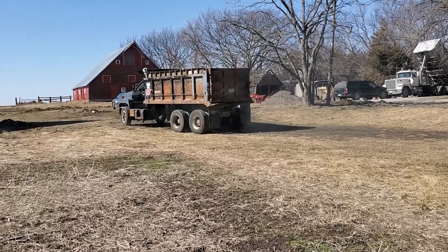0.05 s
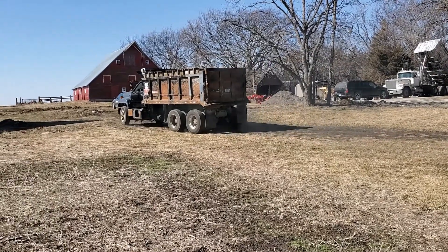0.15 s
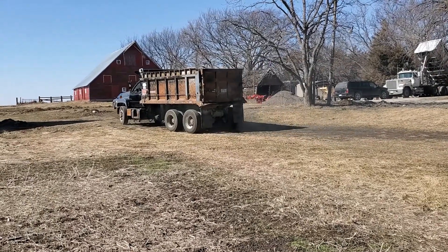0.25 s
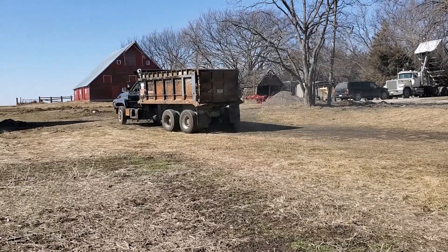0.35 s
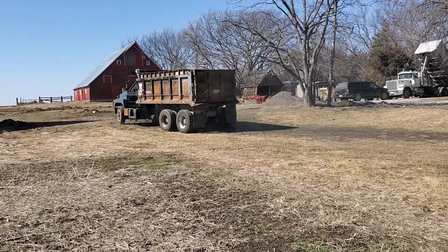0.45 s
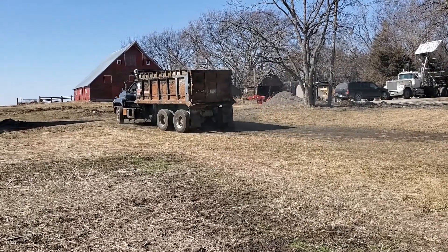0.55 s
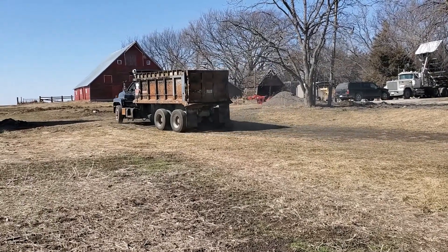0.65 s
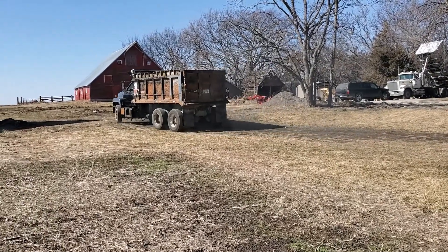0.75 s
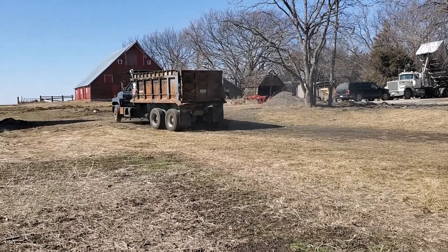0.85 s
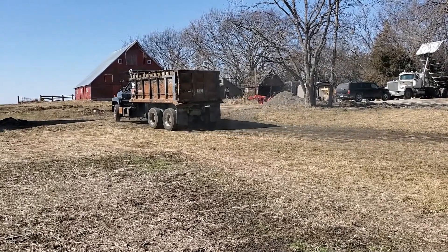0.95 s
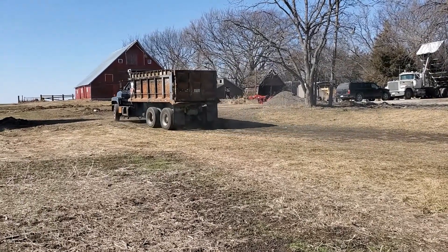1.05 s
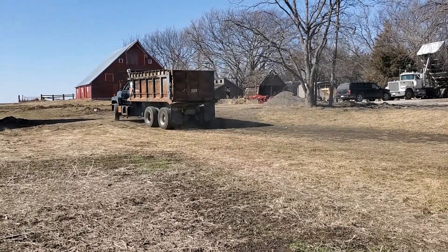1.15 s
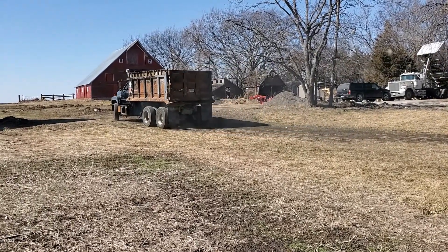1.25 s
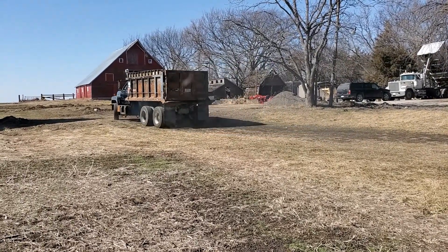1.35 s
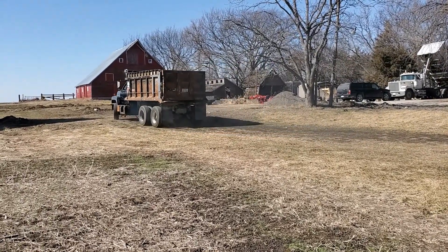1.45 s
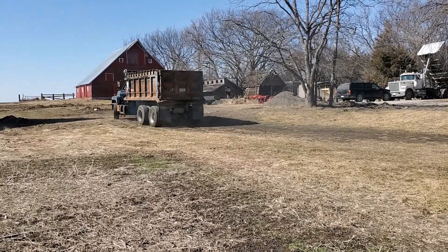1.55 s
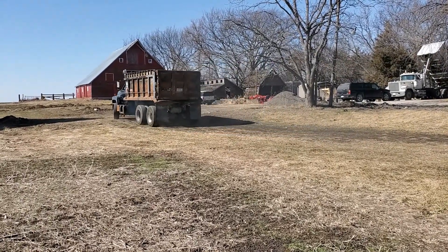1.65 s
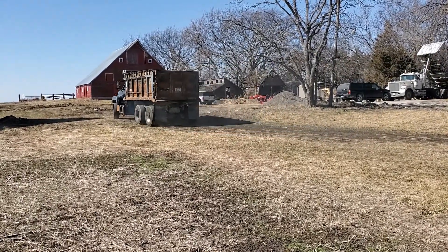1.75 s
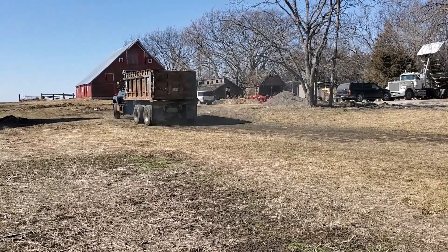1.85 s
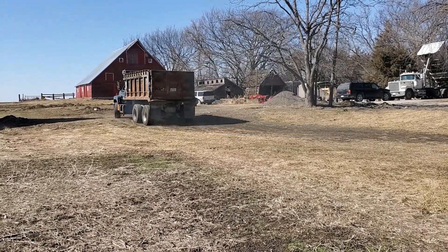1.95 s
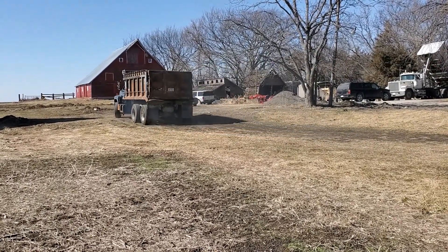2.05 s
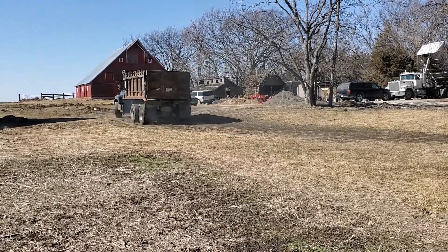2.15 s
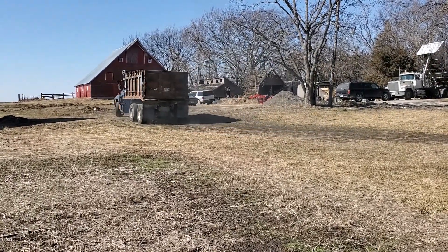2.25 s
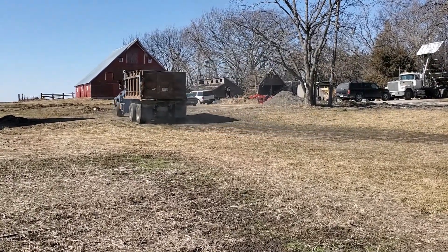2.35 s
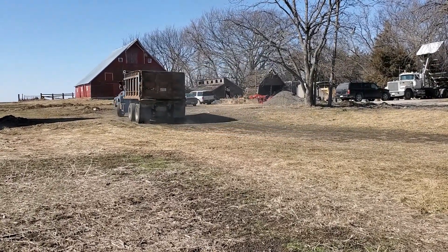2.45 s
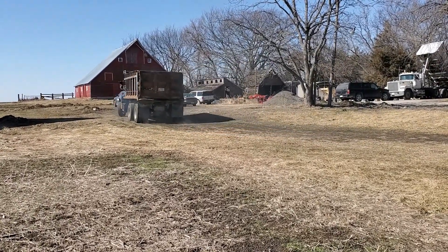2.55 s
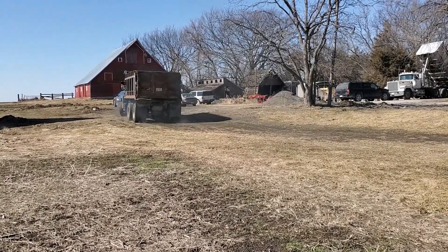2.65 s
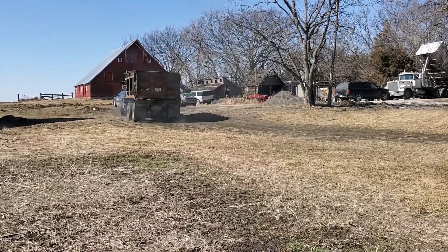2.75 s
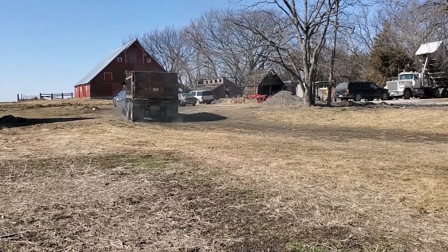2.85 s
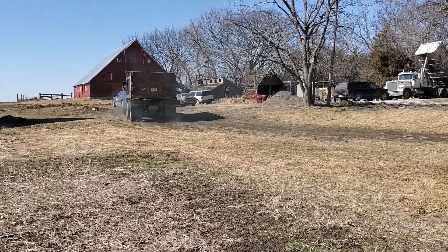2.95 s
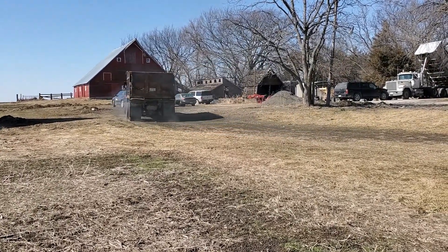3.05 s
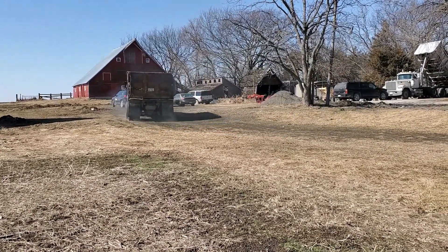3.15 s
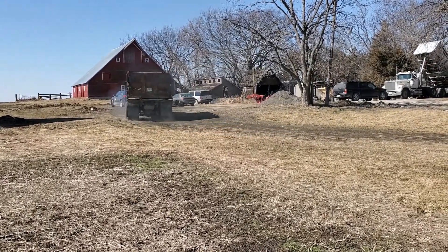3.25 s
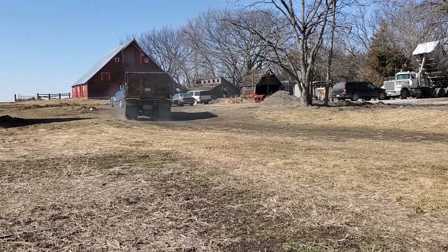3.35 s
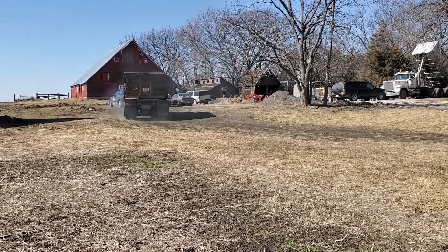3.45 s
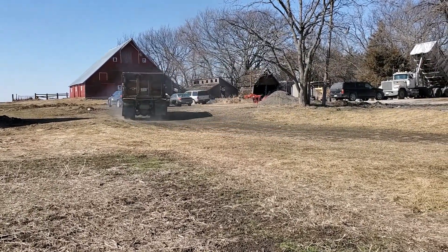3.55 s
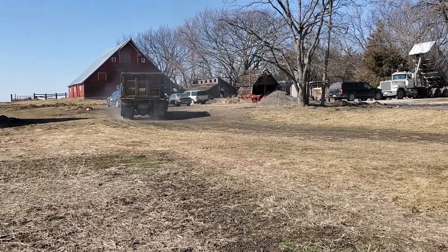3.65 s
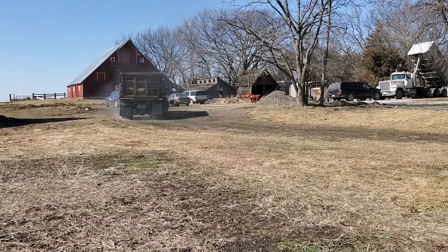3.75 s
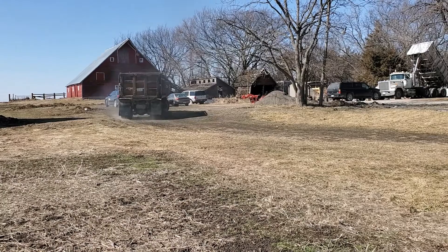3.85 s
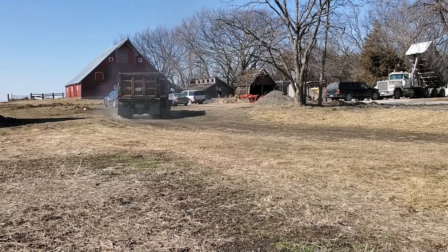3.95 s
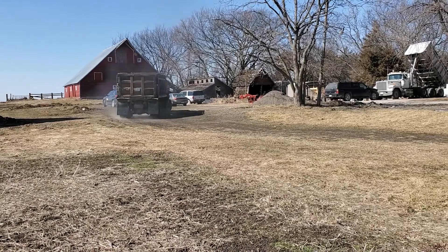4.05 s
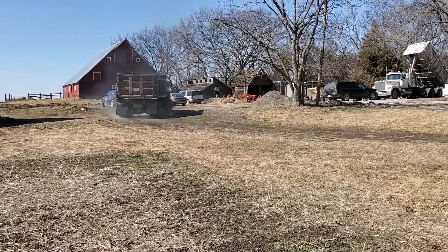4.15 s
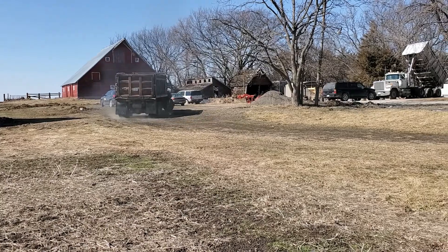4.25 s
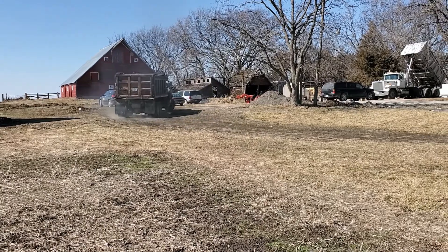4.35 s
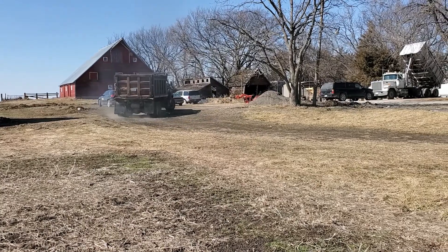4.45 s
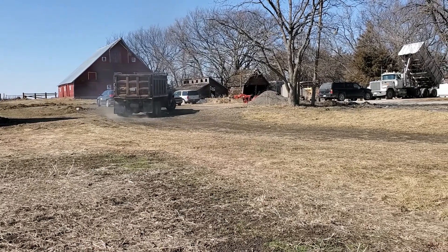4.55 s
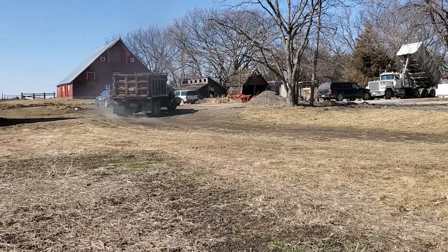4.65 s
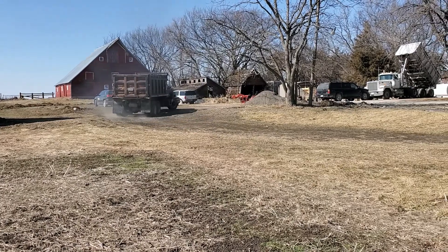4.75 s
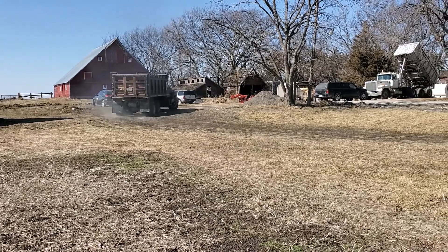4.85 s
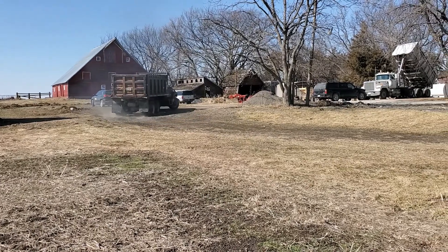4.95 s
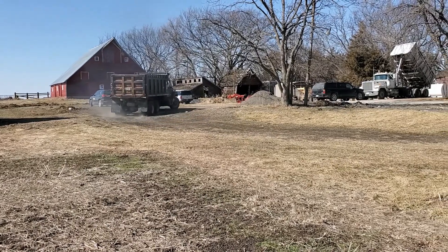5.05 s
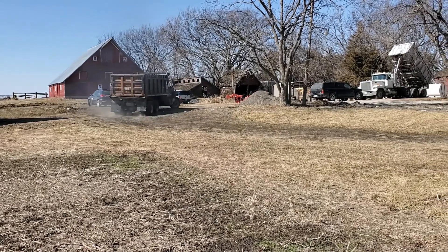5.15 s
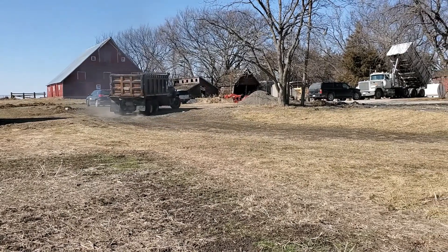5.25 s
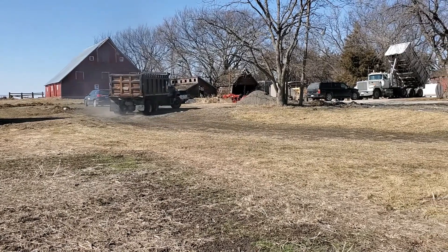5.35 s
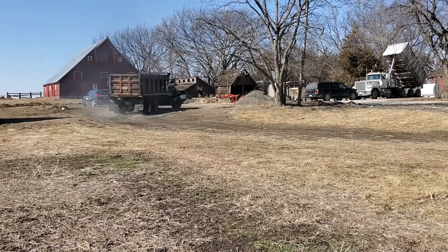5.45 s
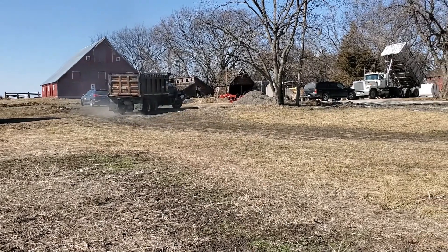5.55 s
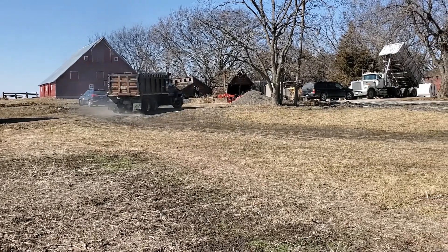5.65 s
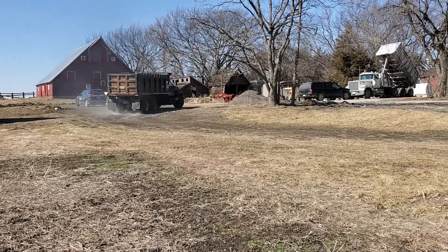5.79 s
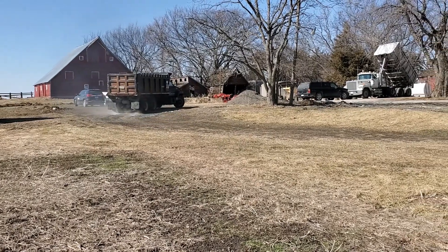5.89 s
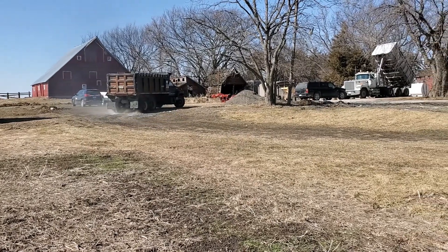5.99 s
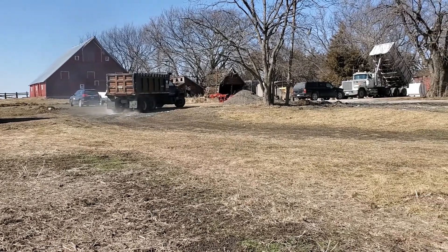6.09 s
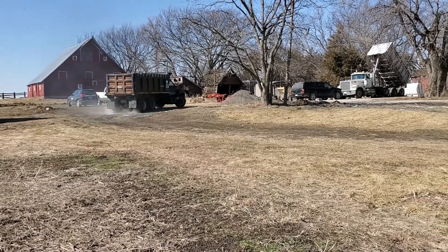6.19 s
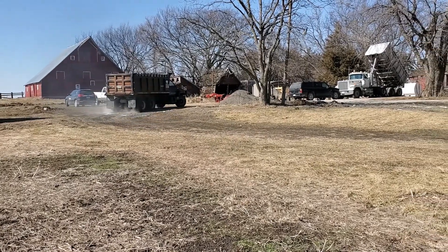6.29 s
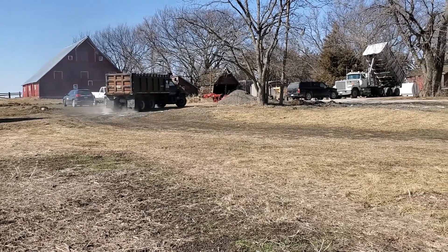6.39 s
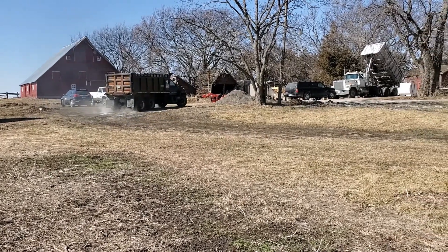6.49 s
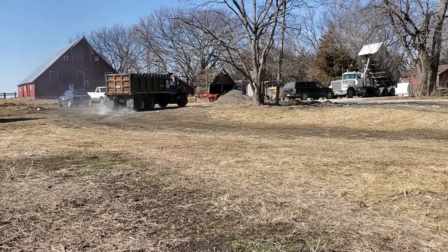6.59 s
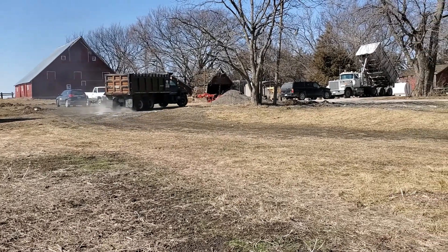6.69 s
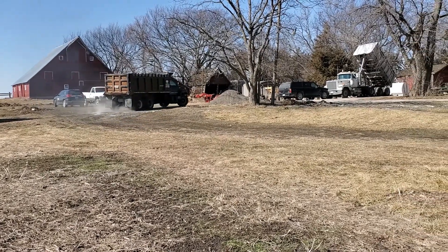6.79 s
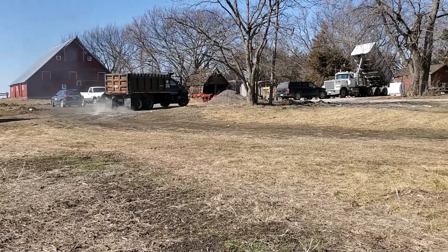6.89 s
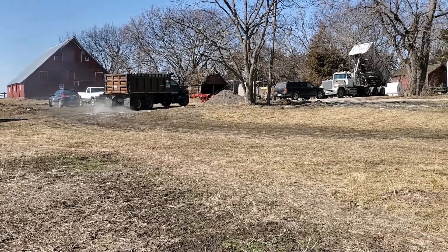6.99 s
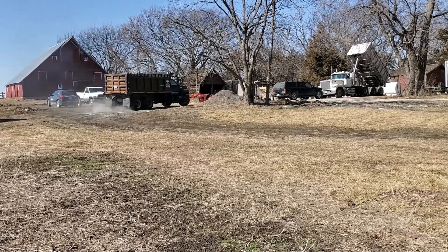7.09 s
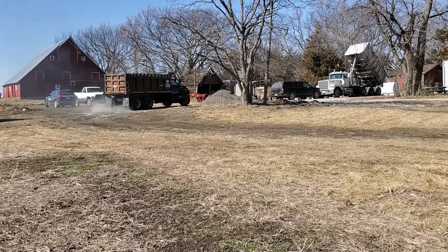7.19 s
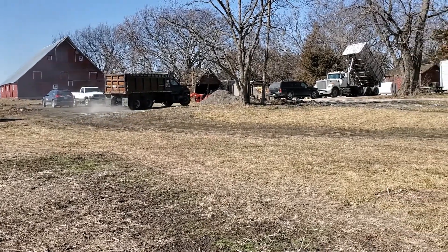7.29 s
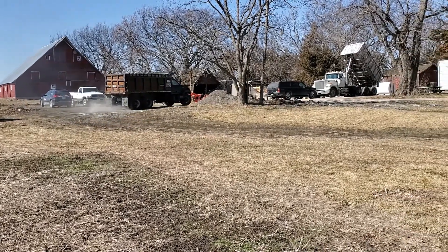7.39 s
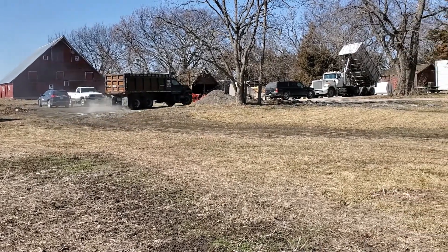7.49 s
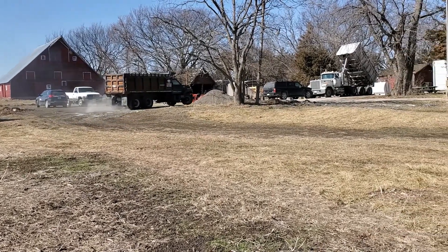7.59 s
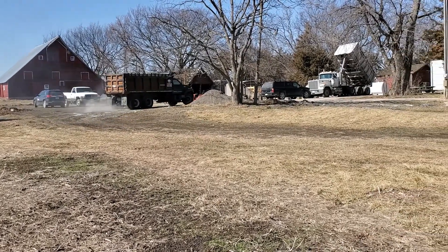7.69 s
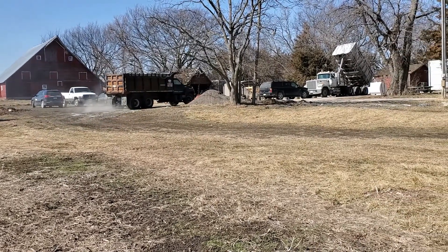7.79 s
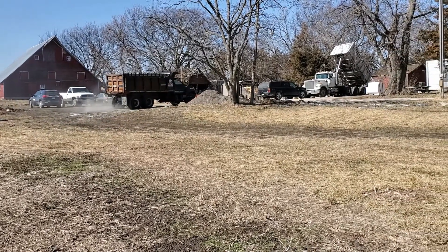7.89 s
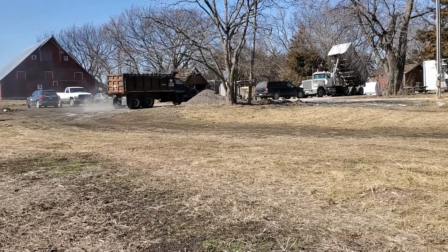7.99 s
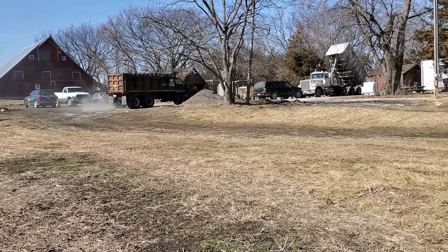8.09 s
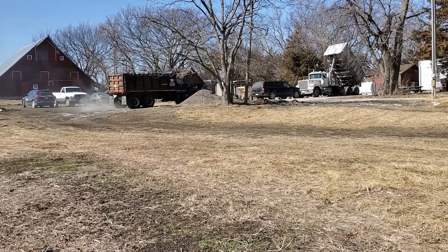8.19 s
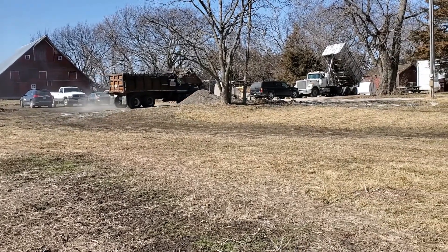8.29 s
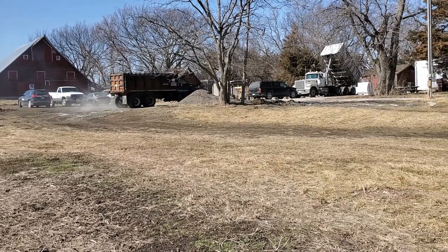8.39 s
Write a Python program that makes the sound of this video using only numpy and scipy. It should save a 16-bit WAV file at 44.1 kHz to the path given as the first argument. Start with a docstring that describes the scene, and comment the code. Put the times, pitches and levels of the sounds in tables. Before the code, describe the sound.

A distant-miked heavy truck engine drones at a nearly constant low pitch, wavering slightly, with fast repeating diesel rattle. Midway it becomes duller and quieter, then the rattle opens up again. Small bed clunks come near the middle and late. Wind starts as soft low puffs and grows into strong uneven thumps in the last two seconds as the hum fades. Dry open field.

```python
"""Grass lot: a six-cylinder diesel dump truck drives slowly away and turns side-on.
Exhaust: wavering tones locked to the engine cycle, plus chuff noise; the hum fades by the end.
Block: shaped noise and clatter repeating every engine cycle, lower while the bed hides the engine.
Bed knocks: filtered noise bursts. Faint tones at multiples of the engine cycle swell and fade.
Wind at two microphone ports: low noise and swinging buffets, hardest late on."""
import sys
import numpy as np
from scipy import signal
from scipy.fft import irfft
from scipy.io import wavfile
from scipy.ndimage import uniform_filter1d

SR = 44100
rng = np.random.default_rng(int(sys.argv[2]) if len(sys.argv) > 2 else 0)


def generate_wav(signal):
    """Clip the signal to [-1, 1] and save it as 16-bit WAV at the path in sys.argv[1]."""
    frames = np.transpose(np.atleast_2d(signal))
    scaled = np.clip(frames, -1, 1) * 32767
    pcm = np.round(scaled).astype(np.int16)
    wavfile.write(sys.argv[1], SR, pcm)


def magnitude_from_level(level_db):
    """Linear magnitude for a level in decibels (20 dB per decade)."""
    exponent = np.asarray(level_db, float) / 20
    return 10 ** exponent


N = 371763

# firing rate, the governor hunting: t/s, f/Hz
FIRING_RATE = [(0.0, 79.7), (0.65, 79.2), (0.95, 79.35), (1.2, 79.0), (1.45, 79.25), (1.75, 78.75),
               (2.1, 79.3), (2.55, 78.05), (2.8, 78.3), (3.0, 78.9), (3.22, 77.9), (3.4, 78.5), (3.7, 78.3),
               (3.95, 79.2), (4.17, 77.8), (4.45, 79.8), (4.7, 78.5), (4.92, 79.5), (5.25, 78.1),
               (5.72, 78.0), (5.97, 79.4), (6.17, 78.6), (6.4, 80.1), (6.75, 79.6), (7.05, 76.2),
               (7.3, 78.0), (7.62, 75.4), (7.9, 76.9), (8.43, 75.5)]
# exhaust tones before port gains: t/s, hum level/dB, octave level/dB
EXHAUST_TONES = [(0.0, -13, -39), (0.25, -13.5, -29.5), (0.9, -14, -32.5), (1.4, -16.5, -29.5),
                 (1.9, -20, -29), (2.5, -14.5, -28.5), (3.1, -17, -29), (3.75, -16, -30.5),
                 (4.2, -16.5, -31.5), (4.48, -15.5, -32.5), (4.85, -19.5, -32.5), (5.6, -16.5, -37.5),
                 (6.2, -17, -33), (6.7, -18.5, -40), (7.0, -19.5, -39), (7.28, -23.5, -37.5),
                 (7.84, -23.5, -42), (8.2, -25, -39), (8.29, -38.5, -49), (8.43, -25, -53)]
# uneven cylinders sound other multiples of the engine cycle: multiple, level re smoothed hum/dB
UNEVEN_TONES = [(3, -38.5), (4, -21), (5, -27.5), (7, -39), (8, -36.5), (9, -27.5), (10, -33.5), (11, -31),
                (14, -41.5), (16, -42.5)]
# exhaust noise spectrum: f/Hz, relative level/dB
CHUFF_SPECTRUM = [(25, -19.5), (60, -2), (130, -1), (200, -9), (300, -62)]
OCTAVE_LAG_RAD = .9

# the bed hides the engine while the truck points away:
# t/s, clatter reference level/dB, treble re clatter/dB, hiss re clatter/dB
BLOCK_LEVELS = [(0.0, -37, -8, -20.5), (0.7, -39, -8, -18), (1.65, -41.5, -9, -16), (2.0, -43.5, -8, -16.5),
                (2.3, -45.5, -11.5, -19.5), (2.65, -46.5, -9, -21), (3.3, -47.5, -10, -16.5),
                (3.63, -48, -10, -20), (3.96, -47.5, -10, -18), (4.3, -45, -10, -20),
                (5.28, -42, -10.5, -20.5), (5.61, -43.5, -7.5, -16.5), (6.27, -41.5, -9, -21.5),
                (6.6, -42.5, -7.5, -16.5), (6.95, -42.5, -6, -20), (7.26, -42.5, -6, -15.5),
                (7.9, -43, -8, -21), (8.43, -43.5, -11, -20.5)]
# knock of each cylinder: relative level/dB
CYLINDER_KNOCK = [-0.5, -5.5, -2, -4.5, 1, -0.5]
# block noise spectra: f/Hz, relative level/dB
RUMBLE_SPECTRUM = [(150, -29), (210, 5.5), (270, -2.5), (400, -5), (470, -4.5), (520, -0.5), (640, -5.5),
                   (780, -14.5), (1000, -45.5), (1500, -100)]
CLATTER_SPECTRUM = [(440, -22.5), (750, -12.5), (934, -3), (1020, -5.5), (1110, -2.5), (1330, -0.5),
                    (1470, -3), (2400, -1), (2700, -15.5), (3510, -52), (5940, -120)]
TREBLE_SPECTRUM = [(1530, -34.5), (2600, -13.5), (2700, -2.5), (3500, -4.5), (3810, -7.5), (5400, -5.5),
                   (7020, -38.5), (11900, -120)]
HISS_SPECTRUM = [(3120, -39), (5300, -12.5), (5850, 0), (7000, 2.5), (8080, -10.5), (9320, -7.5),
                 (10700, -15.5), (12600, -9.5), (14300, -23), (15500, -29.5)]
RUMBLE_DB, RUMBLE_DB_PER_S = 0, 0.05  # rumble re clatter reference, and its slow rise
REPEAT_DB, LOOSE_DB = 0.0, -4.5  # repeating and loose shares of rumble and clatter at t = 0
BLUR_DB_PER_S = .2  # with distance the repeating share passes to the loose one
EVERY_THIRD_DB = 3  # multiples of 3 stand out in the repeating share

# bed knocks over bumps: t/s, level before envelope/dB, pitch f/Hz
BED_KNOCKS = [(3.47, -45, 600), (4.757, -36, 1250), (4.768, -39, 1000), (4.92, -43, 1250),
              (7.172, -37, 1350), (7.176, -46, 4800), (8.27, -48, 900)]

# steady tones in spells: multiple of engine cycle, middle t/s, length/s, level at middle/dB
CYCLE_TONES = [(18, 0.1, 1.6, -42), (18, 3.4, 2.6, -49), (18, 7.6, 3.0, -49), (39, 0.6, 4.0, -50),
               (39, 5.9, 3.8, -51), (42, 1.7, 2.4, -57), (45, 0.3, 2.4, -51), (48, 0.6, 2.4, -58),
               (48, 5.6, 2.4, -54), (51, 5.5, 1.2, -57), (70, 0.4, 1.8, -53), (70, 2.25, 1.5, -54),
               (70, 5.6, 1.6, -60), (76, 5.5, 1.6, -58), (82, 1.3, 2.0, -58), (84, 0.9, 2.6, -51.5),
               (87, 0.7, 2.2, -56), (90, 5.5, 1.2, -60), (93, 5.8, 1.8, -57), (124, 0.8, 2.0, -60)]
# late tone: t/s, level/dB
LATE_TONE_LEVEL = [(7.3, -72), (7.45, -55), (7.85, -56), (8.05, -51), (8.2, -54), (8.43, -68)]
LATE_TONE_HZ = 1108

# wind before lumps and lean: t/s, level/dB
WIND_LEVEL = [(0.0, -62.5), (1.35, -48), (1.75, -34.5), (2.1, -38.5), (2.25, -46), (2.5, -32.5), (2.7, -45),
              (3.0, -29.5), (3.3, -47), (3.6, -34.5), (3.8, -52.5), (4.4, -42), (5.0, -49), (5.7, -33),
              (5.9, -41), (6.4, -21.5), (6.5, -27.5), (6.8, -22), (7.1, -25), (7.22, -34), (7.6, -22),
              (7.75, -29), (8.1, -33.5), (8.28, -31), (8.43, -25)]
# wind noise spectrum: f/Hz, relative level/dB
GUST_SPECTRUM = [(12, -47.5), (20, -25), (53, 8.5), (76, 5), (201, -12), (244, -17.5), (375, -30),
                 (720, -44.5), (900, -56), (1170, -78.5), (1980, -120)]
# sharp buffets on one port: t/s, nominal peak level/dB, port (1 left, -1 right)
PORT_BUFFETS = [(6.067, -23, -1), (6.189, -16.5, -1), (6.244, -20.5, -1), (6.328, -17, -1),
                (6.573, -11, -1), (6.612, -10, -1), (6.717, -15, -1), (6.695, -19.5, -1), (6.748, -16, -1),
                (6.895, -17.5, -1), (6.916, -7.5, -1), (7.025, -22, -1), (7.109, -14, -1), (7.242, -19, 1),
                (7.392, -13.5, -1), (7.436, -19, 1), (7.53, -13.5, -1), (7.673, -21, 1), (7.896, -24, -1)]
WIND_LEAN_DB, WIND_SWAY_DB = -2.5, 4.5  # left over right: mean, random sway
SMALL_BUFFETS_PER_S, SMALL_BUFFET_DB = 6, -6  # random; nominal peak re wind level

# port likeness of airborne noise: f/Hz, likeness 0..1
PORT_LIKENESS = [(60, .99), (600, .97), (800, .8), (1000, .9), (2200, .65), (3100, .4), (4000, .7),
                 (5500, .8), (6500, .35), (9100, .3), (10000, .92), (11200, .35), (12500, .82)]
# port phase: f/Hz, left lead/rad
PORT_LEAD = [(700, 0), (1030, .2), (1810, 1.7), (2500, 1.9), (3010, 3.2), (3360, 6.1), (3880, 7.7),
             (5430, 9.6), (6290, 10), (7240, 8), (8440, 9.7), (9470, 12.56)]
# port balance: f/Hz, left over right/dB
PORT_LEAN = [(60, 7), (110, 2), (200, 6.5), (380, 0.5), (700, 2.5), (1290, -5.5), (2380, 2.5), (4400, 0.5),
             (8120, 2.5), (15000, -3.5)]
# narrow peaks and dips in the noise spectrum: f/Hz, width/Hz, gain at centre/dB
PEAKS_AND_DIPS = [(545, 13, 4), (1280, 13, -4), (1598, 56, 12), (1788, 100, 9), (1875, 46, 6),
                  (2300, 22, -6), (2333, 56, 0), (3130, 25, -2), (3600, 50, 3.5), (4620, 22, -11.5)]


def evened(x):
    """Scales to rms 1."""
    return x / np.sqrt(np.mean(x ** 2) + 1e-20)


def read(points, hz):
    """Reads a table on a log-frequency axis."""
    f, value = np.transpose(points)
    return np.interp(np.log(hz + 1), np.log(f + 1), value)


def curves(rows):
    """One value a sample for each column after time."""
    s, *columns = np.transpose(rows)
    return [np.interp(np.arange(N) / SR, s, column) for column in columns]


def wander(hz):
    """Slow random curve of rms about 1, low-passed near hz."""
    knots = rng.standard_normal(N // 64 + 2)
    smooth = signal.lfilter(*signal.butter(2, hz / (SR / 128)), knots)
    return np.interp(np.arange(N) / 64, np.arange(len(knots)), evened(smooth))


def port_lean(hz, alike=1):
    """Left port's half of the level and phase split; the right port divides by it."""
    return magnitude_from_level(alike * read(PORT_LEAN, hz) / 2) * np.exp(.5j * read(PORT_LEAD, hz))


def noise(spectrum, size, alike, patchy_db):
    """Two-port noise with drifting patches; alike (0..1) scales port likeness, peaks and dips."""
    hz = np.fft.rfftfreq(size, 1 / SR)
    a, b, c, d, patches = rng.standard_normal((4 * N // size + 5, len(hz), 5)).T
    patches = uniform_filter1d(patches, 6, 0)
    patches = evened(uniform_filter1d(patches, 20, 1))
    same = alike * np.clip(read(PORT_LIKENESS, hz), 0, 1)[:, None]
    lean = port_lean(hz, alike)[:, None]
    shared, own = a + 1j * b, c + 1j * d
    right = same * shared + np.sqrt(1 - same ** 2) * own
    z = np.array([shared * lean, right / lean])
    narrow_db = sum(db / (1 + (2 * (hz - f) / width) ** 2) for f, width, db in PEAKS_AND_DIPS)
    z *= magnitude_from_level((read(spectrum, hz) + alike * narrow_db)[:, None] + patchy_db * patches)
    return evened(signal.istft(z, nperseg=size, noverlap=size - size // 4)[1][:, :N])


def exhaust(cycle, hum_db, octave_db):
    """Pipe passes firing tone, octave and uneven-cylinder tones, all wavering, over chuff noise."""
    hum = magnitude_from_level(hum_db + .6 * wander(30)) * np.cos(6 * cycle + .04 * wander(30))
    octave_phase = 12 * cycle - OCTAVE_LAG_RAD + .18 * wander(4)
    octave = magnitude_from_level(octave_db + 1.1 * wander(8)) * np.cos(octave_phase)
    uneven = sum(magnitude_from_level(db + 2.0 * wander(2.5)) * np.cos(k * cycle + .5 * wander(1.5))
                 for k, db in UNEVEN_TONES)
    smooth_hum_db = uniform_filter1d(hum_db, SR)  # 1 s mean
    tones = np.sqrt(2) * (hum + octave + magnitude_from_level(smooth_hum_db) * uneven)
    later = np.r_[np.zeros(4), tones[:-4]]  # left port lags 4 samples
    chuff = magnitude_from_level(smooth_hum_db - 22.5) * noise(CHUFF_SPECTRUM, size=4096, alike=0.97, patchy_db=0.5)
    return np.array([later * magnitude_from_level(-1.73), tones * magnitude_from_level(-1.84)]) + chuff


def block(cycle):
    """Engine block: rumble, repeating clatter, and loose clatter, treble and hiss puffing per firing."""
    clatter_db, treble_db, hiss_db = curves(BLOCK_LEVELS)
    t = np.arange(N) / SR
    rumble_db = clatter_db + RUMBLE_DB + RUMBLE_DB_PER_S * t
    blur_db = BLUR_DB_PER_S * t
    firing = 6 * cycle / (2 * np.pi)
    count = firing.astype(int)
    uneven_db = 1.2 * rng.standard_normal(N // 100)[count]
    strength = magnitude_from_level(np.take(CYLINDER_KNOCK, count % 6) + uneven_db)
    puff = np.exp(-(firing % 1) / 1.8)
    gate = evened(uniform_filter1d(1 + 0.5 * strength * puff, 100))
    rumble = noise(RUMBLE_SPECTRUM, size=4096, alike=0.98, patchy_db=0.0)
    rumble = magnitude_from_level(rumble_db + LOOSE_DB + blur_db) * rumble
    clatter = noise(CLATTER_SPECTRUM, size=2048, alike=0.85, patchy_db=1.5)
    clatter = magnitude_from_level(clatter_db + LOOSE_DB + blur_db) * clatter
    treble = noise(TREBLE_SPECTRUM, size=1024, alike=0.94, patchy_db=1.5)
    treble = magnitude_from_level(clatter_db + treble_db) * treble
    hiss = noise(HISS_SPECTRUM, size=512, alike=0.9, patchy_db=2.4)
    hiss = magnitude_from_level(clatter_db + hiss_db + 0.37 * wander(8.9)) * hiss
    repeating = magnitude_from_level(clatter_db + REPEAT_DB - blur_db) * cycle_clatter(cycle)
    return rumble + repeating + gate * (clatter + treble + hiss)


def cycle_clatter(cycle):
    """Clatter that repeats every engine cycle: three random-phase patterns slowly trade places."""
    k = np.arange(2048 + 1)  # multiples of the engine cycle
    hz = k * np.mean(np.transpose(FIRING_RATE)[1]) / 6
    spectrum = np.hypot(magnitude_from_level(read(CLATTER_SPECTRUM, hz)), magnitude_from_level(read(RUMBLE_SPECTRUM, hz) + 1.5))
    treble_cut_db = 6 * np.clip((hz - 1420) / 150, 0, 1)
    spectrum = spectrum * magnitude_from_level(EVERY_THIRD_DB * (k % 3 == 0) - treble_cut_db)
    lean = port_lean(hz)
    turns, out = np.arange(4096) / 4096, np.zeros((2, N))
    weights = np.array([wander(.5), wander(.5), wander(.5)]) + [[.3], [-.3], [.3]]
    weights = weights / np.linalg.norm(weights, axis=0)
    for phase, weight in zip(rng.random((3, len(k))), weights):
        for port, side in zip(out, [lean, 1 / lean]):
            pattern = irfft(spectrum * side * np.exp(2j * np.pi * phase))
            port += weight * np.interp(cycle / (2 * np.pi), turns, pattern, period=1)
    return evened(out)


def knocks():
    """Steel bed knocks over bumps: short noise bursts, each band-passed around one pitch."""
    out, t = np.zeros(N), np.arange(3000) / SR
    puffs = rng.standard_normal((len(BED_KNOCKS), len(t)))
    for (s, db, hz), puff in zip(BED_KNOCKS, puffs):
        band = signal.butter(2, [.85 * hz, 1.15 * hz], "band", fs=SR, output="sos")
        envelope = magnitude_from_level(db - 60 * t / .1) * np.minimum(t / .003, 1)  # 60 dB in 0.1 s, 3 ms attack
        out[round(s * SR):][:len(t)] += envelope * evened(signal.sosfilt(band, puff))
    return out


def cycle_tones(cycle):
    """Wavering tones at engine-cycle multiples, swelling in spells; a late tone with faint overtones."""
    t = np.arange(N) / SR
    tones = np.zeros(N)
    for k, middle, length, level_db in CYCLE_TONES:
        waver_db, slip = 2.2 * wander(4), .3 * wander(4)
        spell = np.cos(np.pi * np.clip((t - middle) / length, -.5, .5))
        tones += magnitude_from_level(level_db + waver_db) * spell * np.cos(k * cycle + slip)
    waver_db, slip = 2.2 * wander(4), .3 * wander(4)
    turn = 2 * np.pi * LATE_TONE_HZ * t + .5 * slip
    late = np.cos(turn) + magnitude_from_level(-19.0) * np.cos(2 * turn) + magnitude_from_level(-21.0) * np.cos(4 * turn)
    return np.sqrt(2) * (tones + magnitude_from_level(curves(LATE_TONE_LEVEL)[0] + waver_db) * late)


def wind():
    """Lumpy low turbulence, unrelated at the ports; buffets are pushes whose swing slows as they die."""
    level_db = curves(WIND_LEVEL)[0]
    pan_db = WIND_LEAN_DB + WIND_SWAY_DB * np.clip(wander(4), -1.5, 1.5)
    lumps_db = 3.4 * np.clip([wander(12), wander(12)], -2.5, 1.4)
    gust = noise(GUST_SPECTRUM, size=2048, alike=0, patchy_db=-1.2)
    deep = signal.sosfiltfilt(signal.butter(2, 160, fs=SR, output="sos"), gust)
    bright = magnitude_from_level(np.minimum(0.17 * (level_db + 24.0), 0))  # weak gusts are duller
    gust_db = level_db + np.outer([.5, -.5], pan_db) + lumps_db
    out = magnitude_from_level(gust_db) * (deep + bright * (gust - deep))

    t = np.arange(2600) / SR
    push = (1 - np.exp(-(t / .003) ** 2)) * np.exp(-t / .012)
    push = push / push.max()
    at = np.flatnonzero(rng.random(N - SR // 4) < SMALL_BUFFETS_PER_S / SR) + SR // 8
    # small buffets hit the port the wind leans to
    rows = PORT_BUFFETS + [(i / SR, level_db[i] + SMALL_BUFFET_DB, pan_db[i]) for i in at]
    for (s, db, port), (phase, quick) in zip(rows, rng.random((len(rows), 2))):
        swing_hz = 65 + (180 + 160 * quick) * np.exp(-t / 0.0066)
        swing = push * np.sin(2 * np.pi * (np.cumsum(swing_hz) / SR + phase))
        out[int(port < 0), round((s - .004) * SR):][:len(t)] += magnitude_from_level(db) * swing
    return out


def scene():
    """Truck and wind; one engine cycle is six firings."""
    cycle = 2 * np.pi * np.cumsum(curves(FIRING_RATE)[0] / 6) / SR
    truck = exhaust(cycle, *curves(EXHAUST_TONES)) + block(cycle) + knocks() + cycle_tones(cycle)
    return truck + wind()


def top_cut(x):
    """Nothing passes above the cut-off."""
    return signal.sosfilt(signal.butter(12, 15620, fs=SR, output="sos"), x)


def record(dry):
    """Microphone cuts the deepest bass, after a 200-sample fade-in."""
    low_cut = signal.butter(2, 38, "high", fs=SR, output="sos")
    faded = dry * np.minimum(np.arange(N) / 200, 1)
    mix = signal.sosfilt(low_cut, faded)
    return top_cut(mix)


dry = scene()
out = record(dry)
generate_wav(out)
```